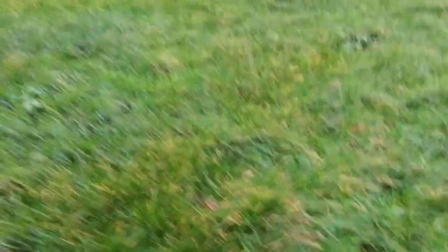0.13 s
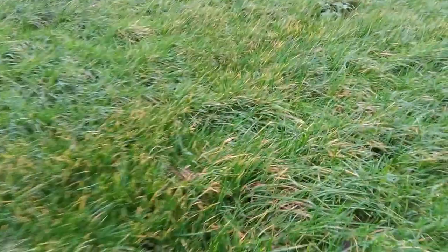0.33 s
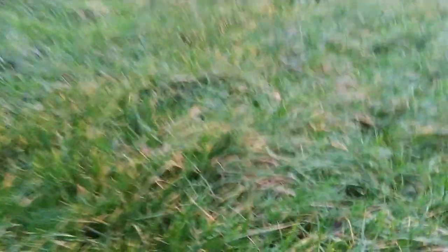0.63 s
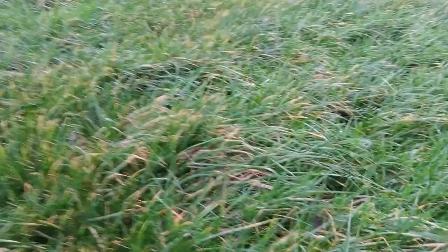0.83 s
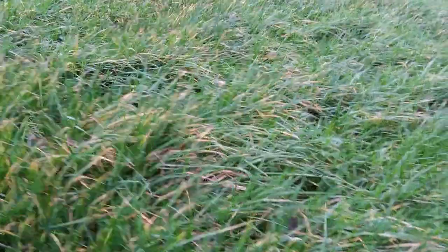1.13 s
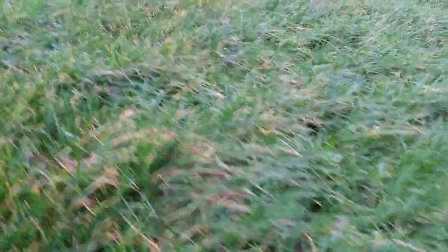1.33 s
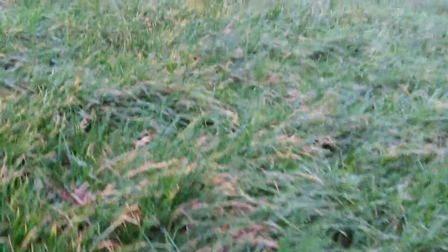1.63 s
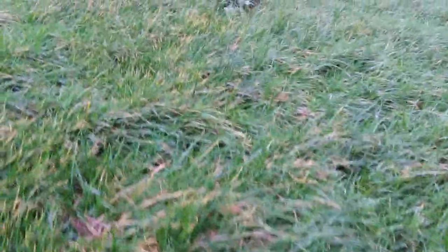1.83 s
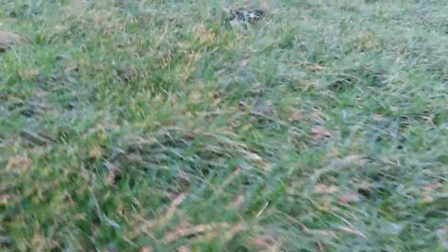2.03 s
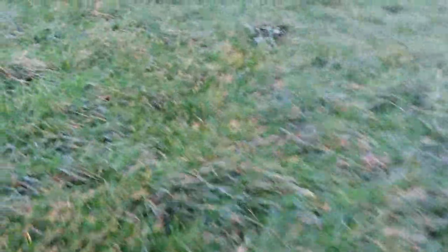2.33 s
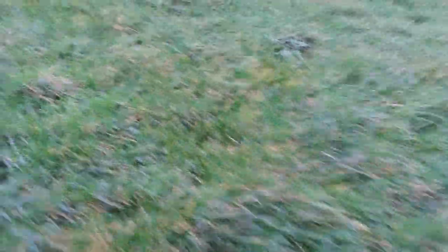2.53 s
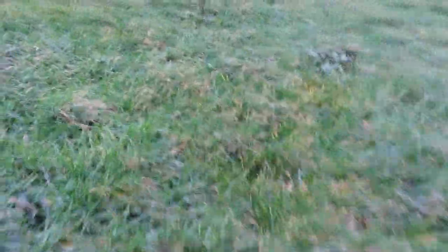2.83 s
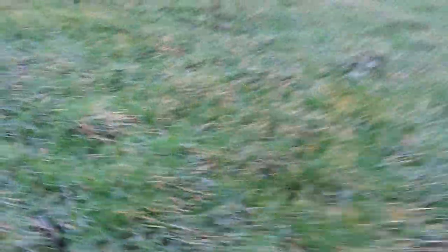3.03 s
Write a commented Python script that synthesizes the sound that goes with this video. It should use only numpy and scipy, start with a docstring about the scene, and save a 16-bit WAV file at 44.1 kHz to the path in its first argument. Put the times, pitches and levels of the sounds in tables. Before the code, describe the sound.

Boots and trousers swish through damp grass, close to a hand-held recorder outdoors. Wet plops and tiny clicks crowd the first second and a half, then sharper snaps and stronger brushing follow, over uneven wind rumble.

```python
"""Quick steps through wet grass in an open field, heard by a small hand-held recorder.
From the start wind buffets the microphone port (lumpy shaped noise) and boots and trousers swish through
the blades (ticks and noise in narrow strips). Wet ground soon squelches (decaying sines with a fizz) and
stalks snap (short band-limited clicks with a faint spray). Wind lulls near 1.6 s and 2.2 s; from 2.5 s
the swish is louder."""
import sys
import numpy as np
from scipy import signal
from scipy.fft import rfft, irfft
from scipy.io import wavfile

SR = 44100
rng = np.random.default_rng(int(sys.argv[2]) if len(sys.argv) > 2 else 0)


def output_pcm(signal):
    """Save a mono or channel-first signal as 16-bit PCM at the path in sys.argv[1].

    Samples are clipped to [-1, 1] before scaling.
    """
    pcm = np.clip(np.atleast_2d(signal).T, -1, 1) * 32767
    wavfile.write(sys.argv[1], SR, np.round(pcm).astype(np.int16))


def nominal_scale(level):
    """Amplitude ratio for a level in decibels (scalar or array-like)."""
    x = np.asarray(level, float) / 20
    return 10 ** x


N = 141120   # samples, 3.2 s
TOP_HZ = 8900   # upper limit of the recorder and of the squelch fizz


def rms_one(x):
    """Scale to rms 1."""
    return x / np.sqrt(np.mean(x ** 2) + 1e-20)


def in_time(rows):
    """Join the columns after the first, time in s, by straight lines."""
    time_s, *columns = np.transpose(rows)
    return [np.interp(np.arange(N) / SR, time_s, column) for column in columns]


def drift(rate_hz):
    """Slow random wander of rms 1: noise through two equal low-pass poles at rate_hz."""
    hop = 40   # samples between the computed points
    pole = np.exp(-2 * np.pi * rate_hz * hop / SR)
    noise = rng.standard_normal(N // hop + 2002)
    slow = signal.lfilter([1], [1, -2 * pole, pole * pole], noise)[2000:]   # settled part
    return np.interp(np.arange(N) / hop, np.arange(len(slow)), rms_one(slow))


def band(x, low_hz, high_hz, order=2):
    """Butterworth band-pass."""
    sos = signal.butter(order, [low_hz, high_hz], "band", fs=SR, output="sos")
    return signal.sosfilt(sos, x)


def coloured(spectrum):
    """Noise of rms 1 whose spectrum follows relative levels in dB per Hz."""
    hz, db = np.transpose(spectrum)
    bin_hz = np.maximum(np.arange(N // 2 + 1) * SR / N, 1)
    gain = nominal_scale(np.interp(np.log(bin_hz), np.log(hz), db, left=-120, right=-120))
    return rms_one(irfft(rfft(rng.standard_normal(N)) * gain, N))


def wind():
    """Eddies hit the port in lumps that rumble, flutter and upper edge share to different degrees."""
    # gusts and lulls at the port: time_s, rumble_db, flutter_db, edge_db
    gusts = [(0, -31.5, -30.5, -35.5), (.1, -24.5, -16, -31), (.25, -22, -21.5, -22),
             (.31, -32.5, -33, -44.5), (.45, -28, -27, -34), (.56, -26, -20, -29.5), (.66, -26, -25, -35),
             (.79, -20, -21.5, -22.5), (.91, -29, -21, -30), (.96, -29, -35.5, -48),
             (1.15, -21.5, -27.5, -37), (1.23, -31, -27.5, -44.5), (1.32, -22.5, -20, -22.5),
             (1.38, -22, -23.5, -43.5), (1.45, -23, -20.5, -24.5), (1.6, -37, -45.5, -61),
             (1.85, -32, -38, -44.5), (2.02, -29, -27.5, -40), (2.13, -19, -27.5, -32),
             (2.22, -36.5, -49.5, -67.5), (2.59, -29, -30.5, -33.5), (2.64, -16, -26, -27.5),
             (2.75, -25, -22, -28.5), (2.83, -33.5, -42, -45.5), (2.92, -17.5, -15.5, -24),
             (3.07, -27, -34, -48.5), (3.14, -30.5, -17, -34.5), (3.2, -14, -32, -48)]
    # colours of the wind noise, relative: frequency_hz, density_db_per_hz
    rumble_colour = [(35, -47.5), (48, -20.5), (65, -5.5), (100, -1), (140, -3.5), (210, -23.5)]
    flutter_colour = [(90, -20.5), (140, 1), (220, -1), (300, -8), (420, -21)]
    edge_colour = [(200, -28), (300, 4), (450, 2), (700, -11), (1000, -16), (1300, -72)]
    rumble_db, flutter_db, edge_db = in_time(gusts)
    lumps_db = 1.8 * drift(25)
    rumble = rms_one(coloured(rumble_colour) * nominal_scale(2.0 * lumps_db))
    flutter = rms_one(coloured(flutter_colour) * nominal_scale(lumps_db))
    edge = rms_one(coloured(edge_colour) * nominal_scale(0.25 * lumps_db + 4.28 * drift(21)))
    return nominal_scale(rumble_db) * rumble + nominal_scale(flutter_db) * flutter + nominal_scale(edge_db) * edge


def swish():
    """Blades rub as noise and clumps of tiny ticks, in narrow strips that swell and fade on their own."""
    # brushing through the blades, before flicker: time_s, hiss_db, low_db, middle_db, top_db
    brushing = [(0, -55, -67, -71, -93), (0.059, -68, -50, -68.5, -78), (.22, -61, -73, -69, -101.5),
                (.28, -52, -47.5, -52, -103), (0.371, -58, -53.5, -59.5, -100.5),
                (.58, -68.5, -76, -70.5, -83), (.755, -71.5, -54.5, -70.5, -91),
                (.775, -54, -45.5, -65, -71), (.93, -54.5, -52.5, -53.5, -75),
                (1.19, -56.5, -81, -58.5, -83), (1.22, -51.5, -66.5, -77, -64),
                (1.5, -59.5, -70.5, -52.5, -113.5), (1.601, -66, -61, -70.5, -110.5),
                (1.8, -67, -60, -70, -85), (1.821, -50.5, -44.5, -48, -59.5),
                (1.93, -56.5, -50.5, -56, -68), (2.02, -54.5, -84.5, -62, -84.5),
                (2.089, -52, -39, -53, -60), (2.199, -54.5, -56, -70.5, -65),
                (2.298, -81, -70, -73.5, -73.5), (2.38, -55, -53, -65, -63), (2.5, -52, -54, -63.5, -61),
                (2.52, -45, -37.5, -43, -62.5), (2.659, -43, -54.5, -42.5, -54),
                (2.86, -44.5, -44, -46, -58.5), (2.952, -52.5, -49, -63.5, -68),
                (3.031, -42, -45, -42.5, -45), (3.2, -43, -42, -46, -58)]
    # bands of hiss, low, middle and top: low_hz, high_hz
    swish_bands = [(3302, 4900), (801.7, 1354), (1542, 3220), (5610, 9300)]
    strip_count, patchy_db, flicker_db = 4, 2.3, 2
    grain_share = 0.5   # of the power; the rest is smooth rubbing noise

    # a few ticks are much larger than the rest
    sizes = nominal_scale(4.5 * np.minimum(rng.exponential(1, N), 5)) * rng.choice([-1, 1], N)
    ticks_per_s = 600 * nominal_scale(3 * drift(14.0))   # comes in clumps
    grains = rms_one(sizes * (rng.random(N) < ticks_per_s / SR))
    rubbing = rng.standard_normal(N)
    source = np.sqrt(grain_share) * grains + np.sqrt(1 - grain_share) * rubbing

    flicker = nominal_scale(flicker_db * drift(17))   # all bands together
    out = 0
    for (low_hz, high_hz), level_db in zip(swish_bands, in_time(brushing)):
        edges_hz = np.geomspace(low_hz, high_hz, num=strip_count + 1)
        strips = 0
        for k in range(strip_count):
            strip = band(source, edges_hz[k], edges_hz[k + 1])
            strips = strips + (-1) ** k * nominal_scale(patchy_db * drift(12.5)) * strip
        out = out + nominal_scale(level_db) * flicker * rms_one(strips)
    return out


def squelches():
    """A pocket of air pops and rings a few cycles, low ones with more overtone, leaving a wet fizz."""
    # wet ground under the sole and, higher, drops bursting on blades, before the common gain:
    # start_s, level_db, pitch_hz
    pops = [(0.035, -42, 1357), (0.059, -34, 1170), (0.25, -37, 1260), (.388, -35.5, 3930),
            (.441, -34.5, 1414), (0.476, -39, 1330), (.501, -44, 4230), (.507, -48, 6860),
            (0.545, -48, 4600), (.637, -51.5, 4800), (.676, -48, 4140), (0.923, -31.5, 1200),
            (1.154, -39, 2320), (1.166, -42, 2270), (1.353, -40, 3960), (1.884, -35.5, 1610),
            (2.205, -39.5, 7200), (2.349, -47, 6300), (2.375, -43.5, 870), (2.447, -46.5, 910),
            (2.982, -37, 1054)]
    gain_db, fizz_db = 10.5, -22.5   # common gain; fizz at its start, before that gain
    out, t = np.zeros(N + 4000), np.arange(4000) / SR
    for start_s, level_db, hz in pops:
        cycles = hz * t
        shape = (1 - np.exp(-cycles)) * nominal_scale(-20 * cycles / 9)   # falls 20 dB in 9 cycles
        overtone = (800 / hz) ** 2 * np.sin(2 * np.pi * 1.7 * cycles)
        pop = np.sin(2 * np.pi * cycles) + overtone
        noise = rng.standard_normal(len(t))
        fizz = rms_one(band(noise, 0.96 * hz, min(1.3 * hz, TOP_HZ), order=3))
        tail = nominal_scale(fizz_db - 0.18 * cycles) * fizz
        start = int(start_s * SR)
        out[start:start + len(t)] += nominal_scale(level_db + gain_db) * (shape * pop + tail)
    return out[:N]


def snaps():
    """A stalk breaks in one very short click whose four bands peak together; a faint spray follows."""
    # breaking stalks: start_s, peak_db of the first band, then low_db, middle_db, top_db relative to it
    breaks = [(0.1173, -29.5, -2, -18.5, -12.5), (0.2348, -21, 4, 4, -19), (0.2436, -24.5, -10, -3.5, -37),
              (0.3143, -29, 2.5, 1.5, -30), (0.332, -29, -5.5, -4.5, -45), (0.7661, -31.5, 5.5, -5, -1),
              (0.7814, -19, -12.5, -18, -28), (0.8635, -25.5, -19, -1, -49), (0.8913, -22.5, -7, 7, -46),
              (0.9189, -17.5, -0.5, -3.5, -20), (0.9273, -20, -27, -11, -11),
              (0.9677, -23, -12, -6.5, -13.5), (1.001, -22, -8, -3.5, -12.5),
              (1.0117, -17.5, -4.5, -2.5, -14.5), (1.069, -34, -30, 10, -15), (1.1258, -25, -25.5, 5, -57),
              (1.21, -22.5, -40.5, -15, -15), (1.2948, -19, -39, -14.5, -40),
              (1.3841, -22.5, -14.5, -7, -16), (1.4683, -23, -19, 0.5, -56), (1.8121, -11, 1.5, 0, -17),
              (1.9733, -12.5, -24, -15, -28.5), (2.0504, -17, 7.5, -47, -8),
              (2.1133, -16.5, -2.5, -14, -5.5), (2.5734, -17.5, 0.5, 0.5, 3), (2.795, -6.5, -5, -13, -26.5),
              (3.0194, -29, 11, 9, -25), (3.1045, -13.5, 0.5, 6.5, -56.5)]
    # bands of the click, first, low, middle and top: low_hz, high_hz
    snap_bands = [(3203, 4750), (485, 1440), (1502, 3080), (5820, 8700)]
    lag_s = 0.001187   # from onset to peak
    spray_db, spray_t60_s = -25, 0.038
    start_s, peak_db, *other_db = np.transpose(breaks)
    peak_at = ((start_s + lag_s) * SR).astype(int)
    fall = nominal_scale(-60 / (spray_t60_s * SR))   # per sample
    noise, out = rng.standard_normal(N), 0
    for (low_hz, high_hz), relative_db in zip(snap_bands, [0 * peak_db] + other_db):
        clicks = np.full(N, 1e-18)
        clicks[peak_at] = nominal_scale(peak_db + relative_db)
        # filtered both ways, so the pulse is symmetric about its peak
        one_way = band(np.arange(801) == 400, low_hz, high_hz)
        pulse = band(one_way[::-1], low_hz, high_hz)
        decay = signal.lfilter([1], [1, -fall], clicks)
        spray = nominal_scale(spray_db) * decay * rms_one(band(noise, low_hz, high_hz, order=3))
        out = out + signal.fftconvolve(clicks, pulse / pulse.max(), "same") + spray
    return out


def scene():
    """Wind, swish, squelches and snaps at one microphone."""
    return (wind() + swish() + squelches() + snaps())[None]


def suppressor(x):
    """Noise suppressor: above 800 Hz each narrow bin whose recent power is weak is turned down."""
    threshold_db, from_hz, deepest_db = -85, 800, -11
    hz, _, bins = signal.stft(x, SR, nperseg=512, boundary="even")
    power = signal.lfilter([0.2], [1, -0.8], np.abs(bins) ** 2)   # recent average
    gain = power ** 2 / (power ** 2 + nominal_scale(4 * threshold_db))   # one half at the threshold
    gain = np.where(hz[:, None] > from_hz, np.maximum(gain, nominal_scale(deepest_db)), 1)
    return signal.istft(bins * gain, SR, nperseg=512)[1][:, :N]


def band_limit(x):
    """A steep low-pass at the top of the band."""
    return signal.sosfilt(signal.butter(12, 8370, fs=SR, output="sos"), x)


def record(dry):
    """The hand-held recorder cuts the bass below 45 Hz, suppresses weak noise and cuts the top."""
    bass_cut = signal.butter(2, 45, "high", fs=SR, output="sos")
    top_cut = signal.cheby2(10, 60, TOP_HZ, fs=SR, output="sos")   # 60 dB down from here up
    quieted = suppressor(signal.sosfilt(bass_cut, dry))
    mix = signal.sosfilt(top_cut, quieted)
    return band_limit(mix)


dry = scene()
out = record(dry)
output_pcm(out)
```